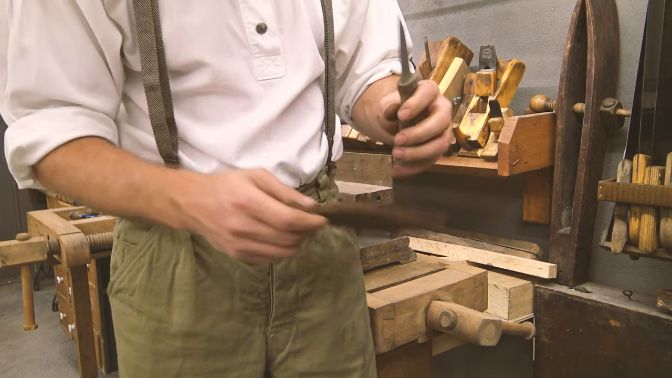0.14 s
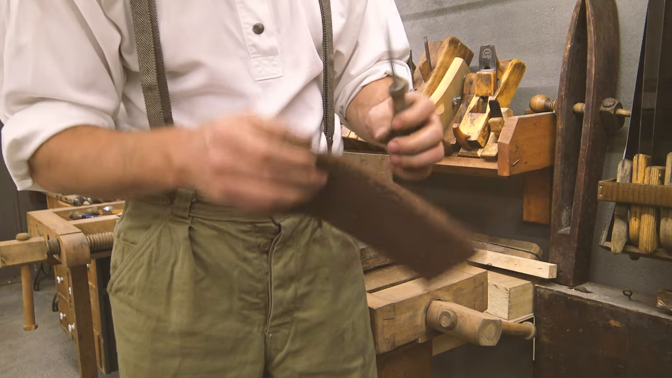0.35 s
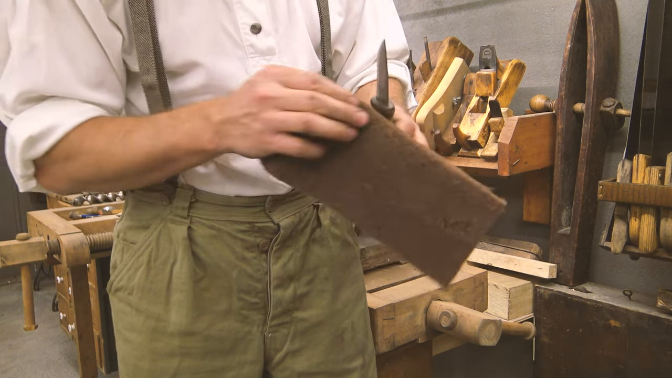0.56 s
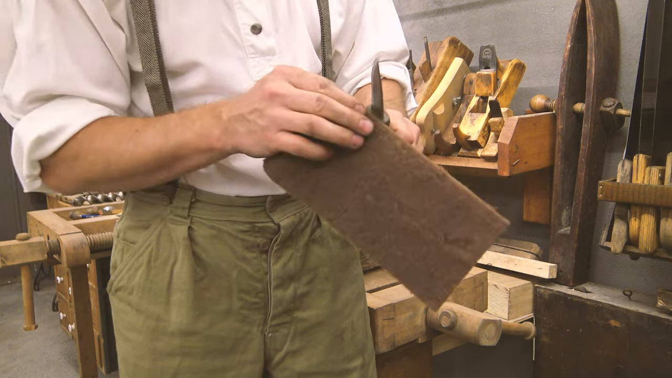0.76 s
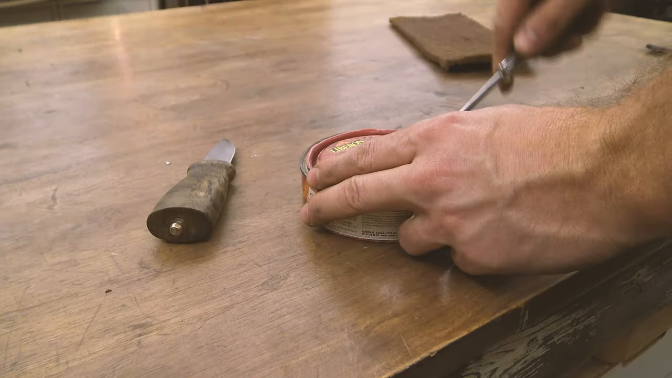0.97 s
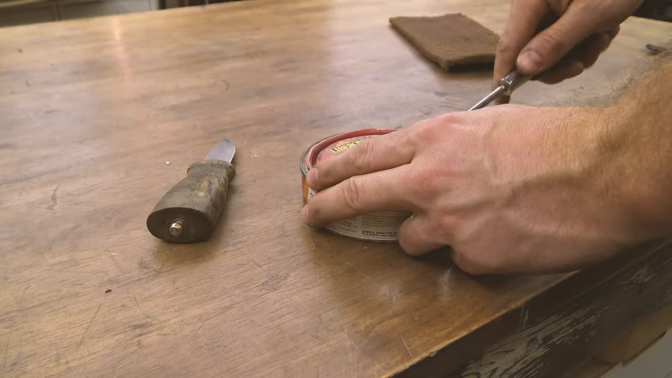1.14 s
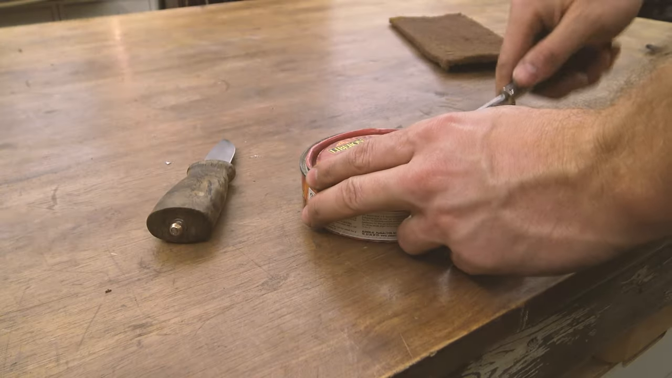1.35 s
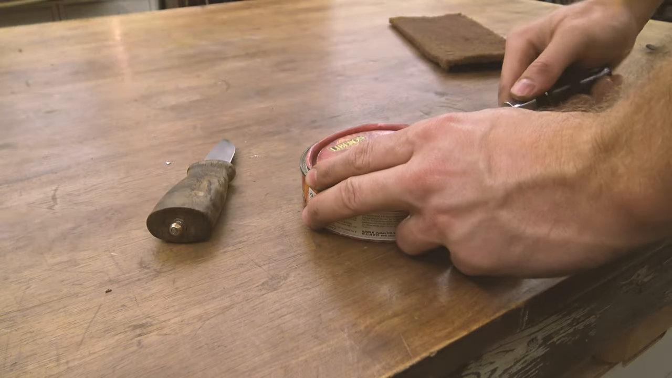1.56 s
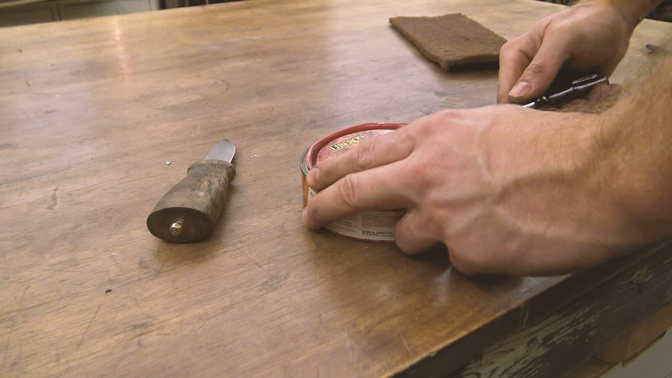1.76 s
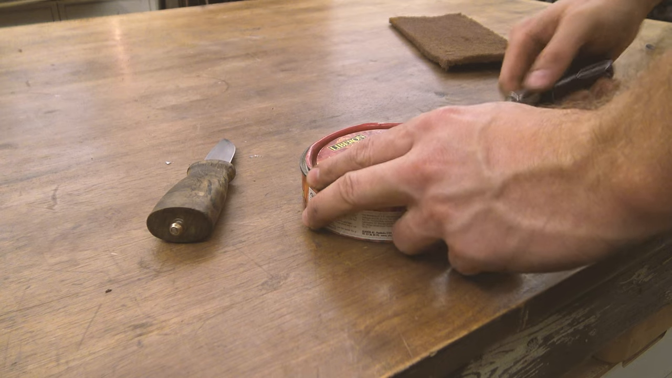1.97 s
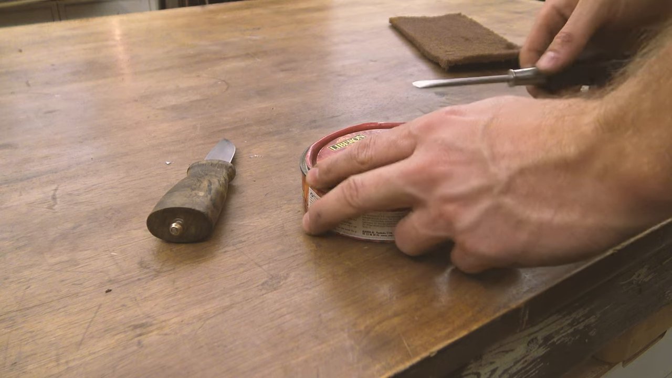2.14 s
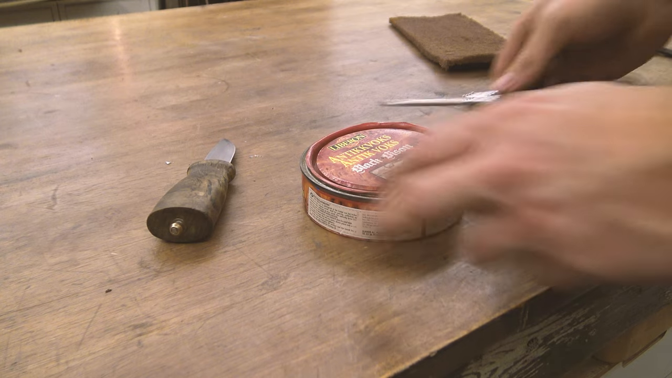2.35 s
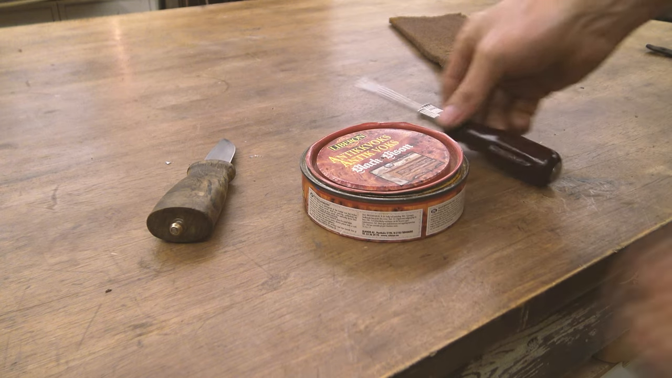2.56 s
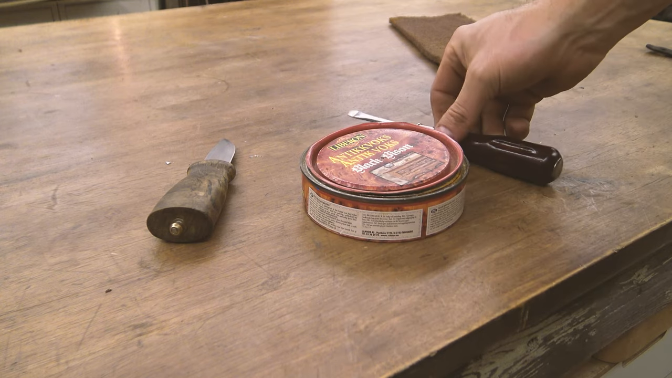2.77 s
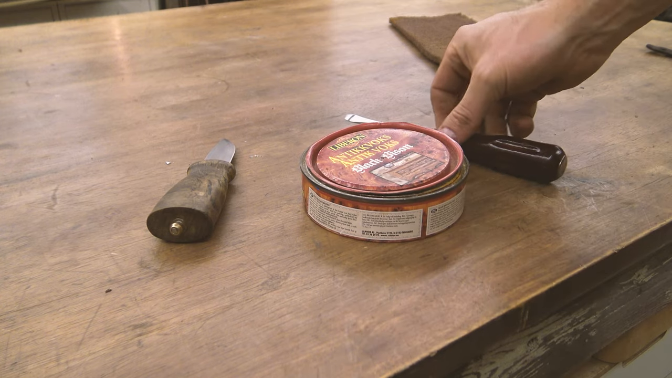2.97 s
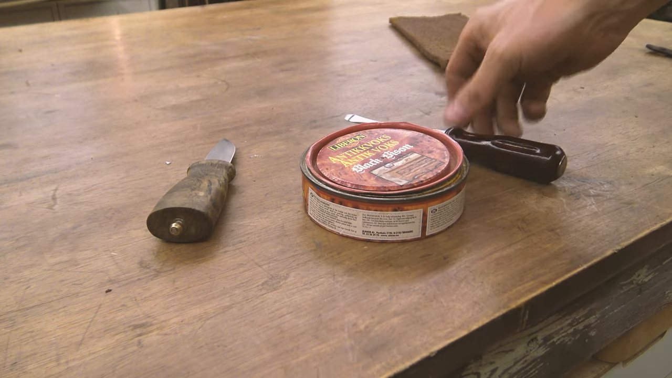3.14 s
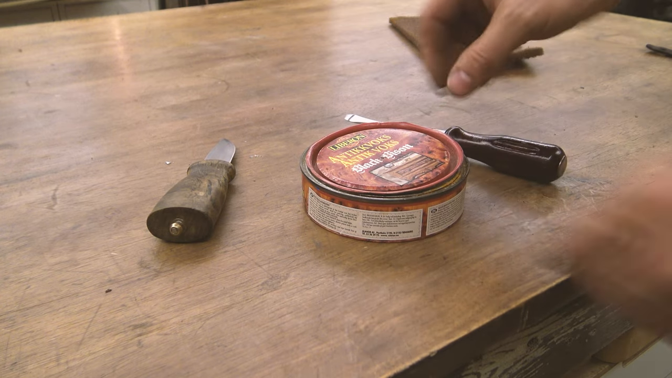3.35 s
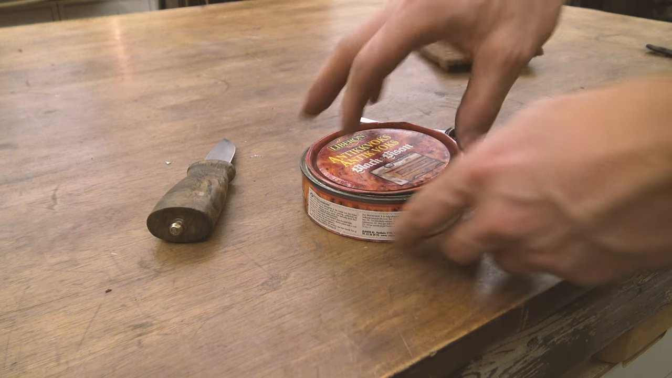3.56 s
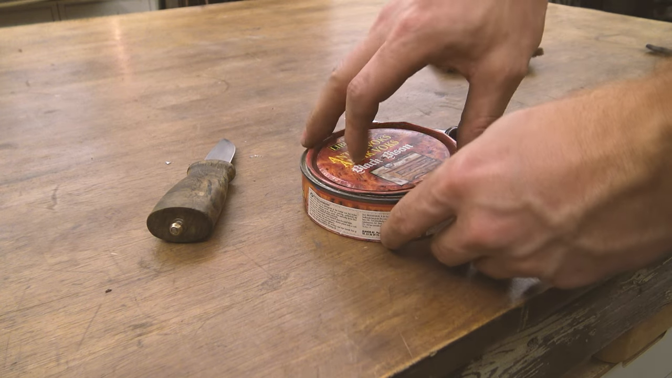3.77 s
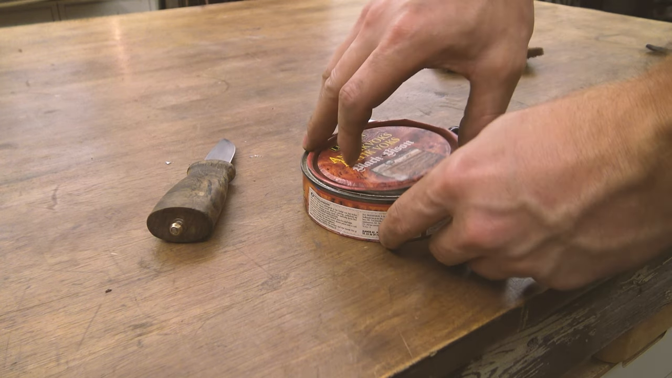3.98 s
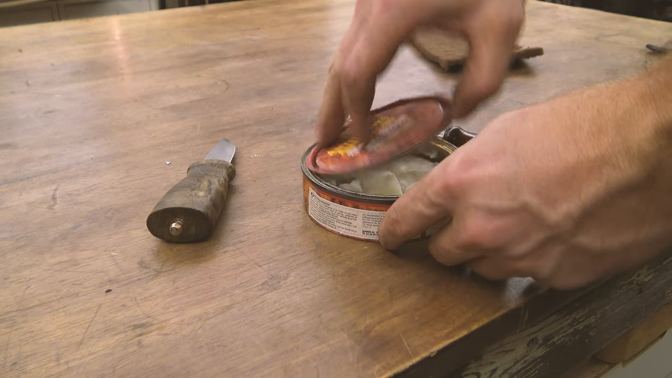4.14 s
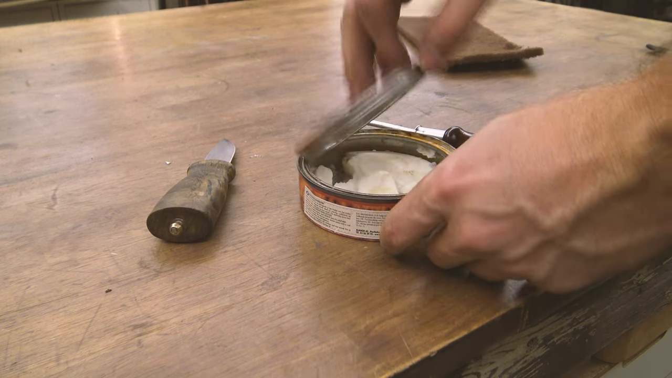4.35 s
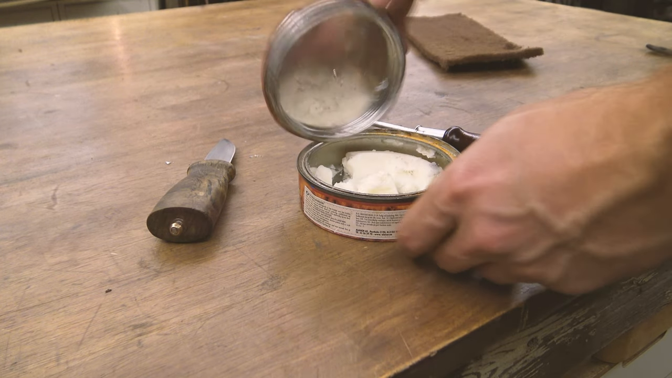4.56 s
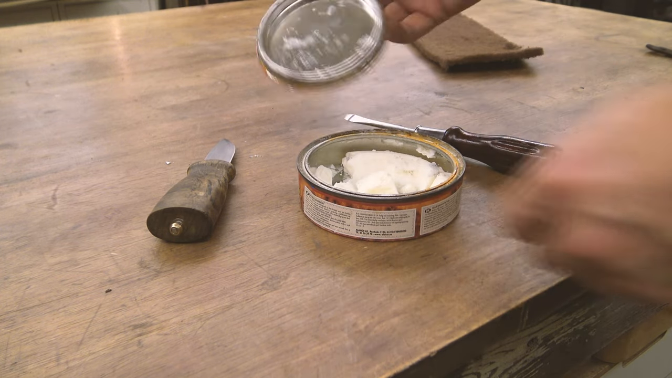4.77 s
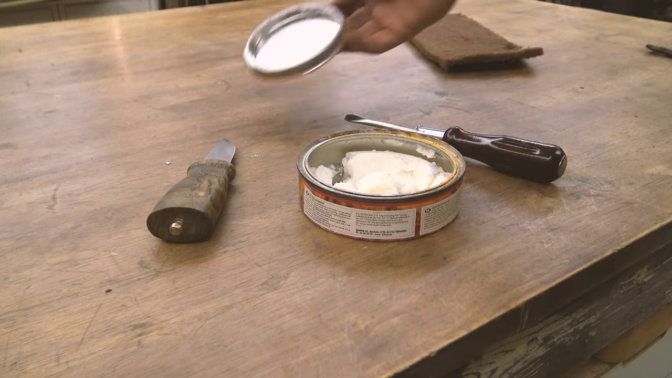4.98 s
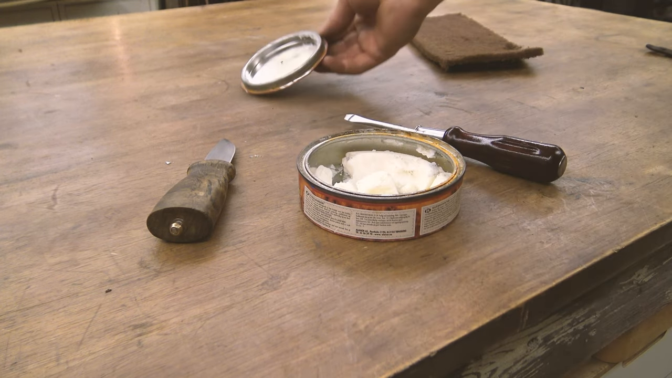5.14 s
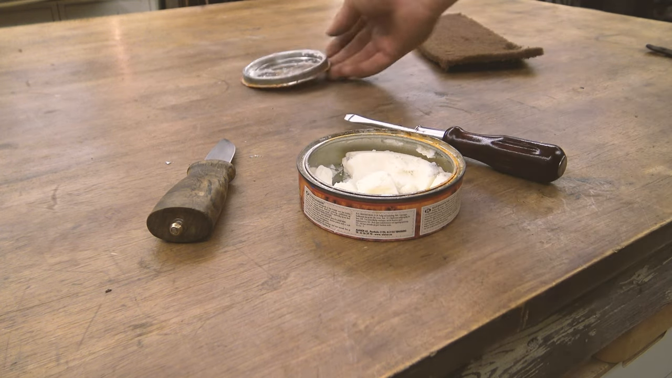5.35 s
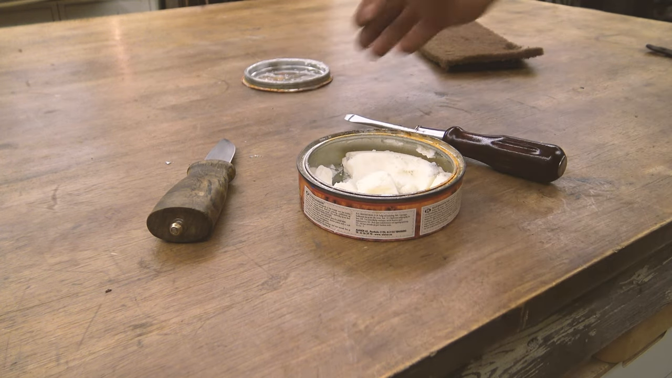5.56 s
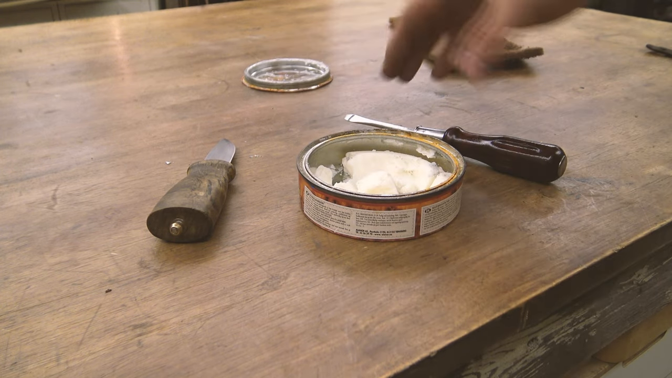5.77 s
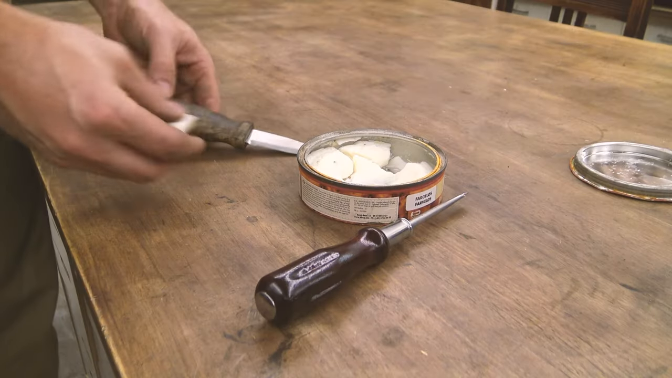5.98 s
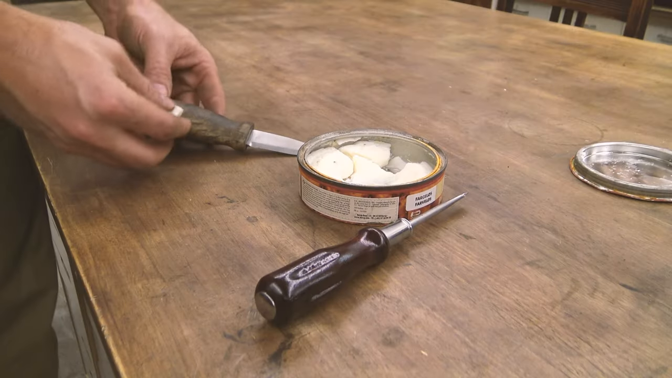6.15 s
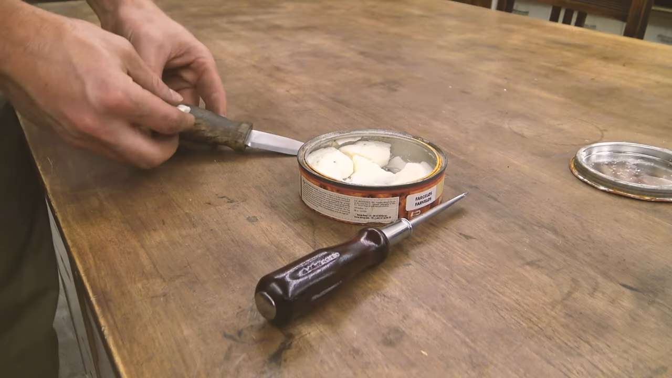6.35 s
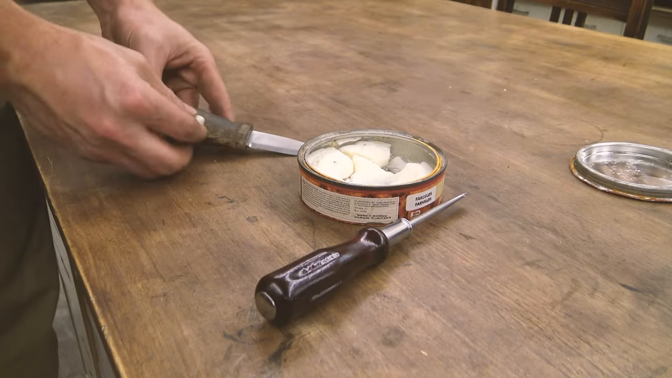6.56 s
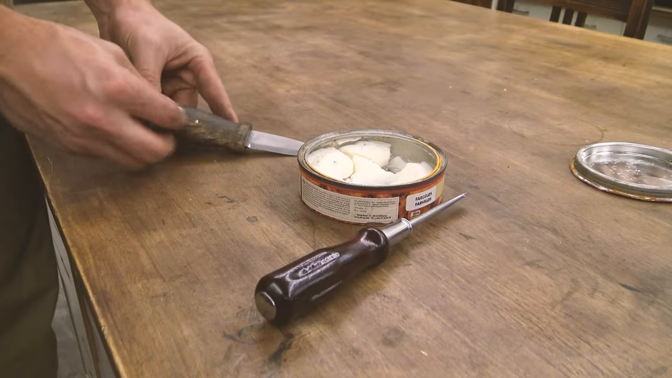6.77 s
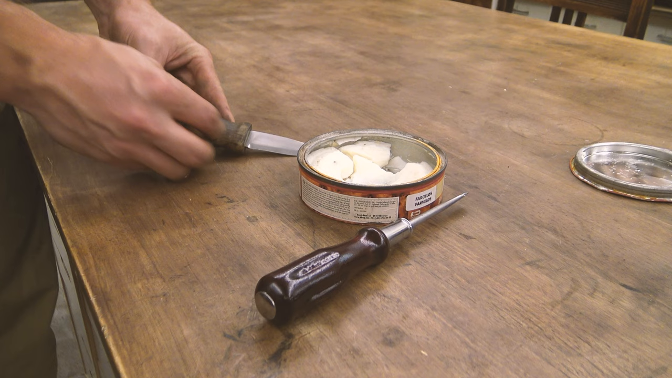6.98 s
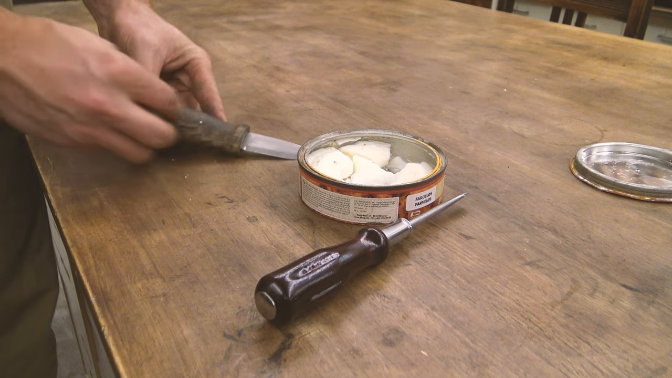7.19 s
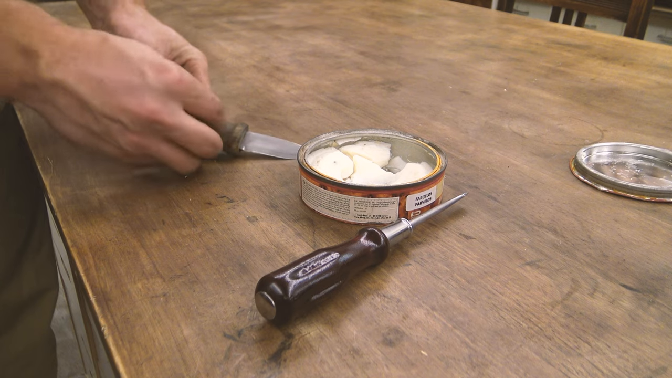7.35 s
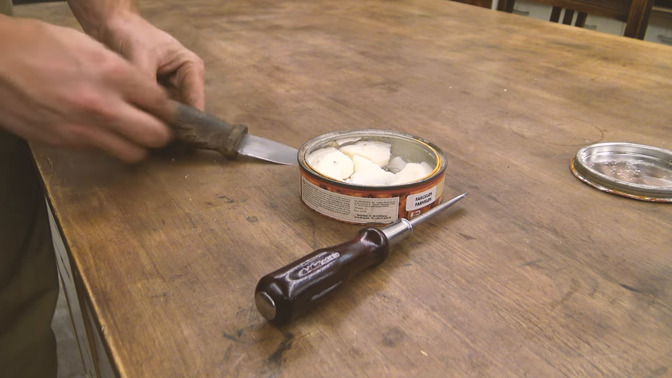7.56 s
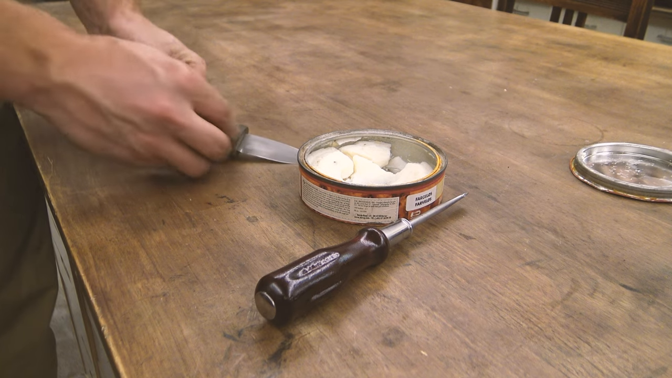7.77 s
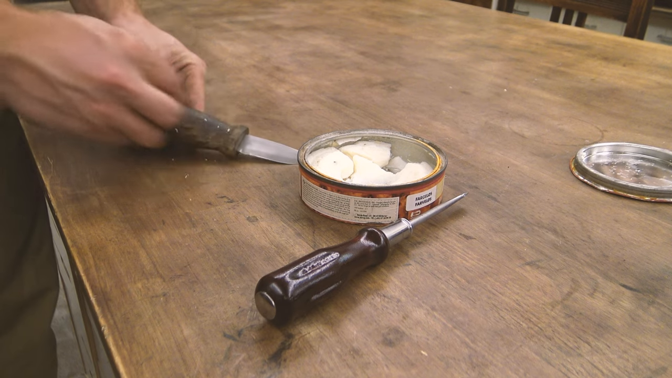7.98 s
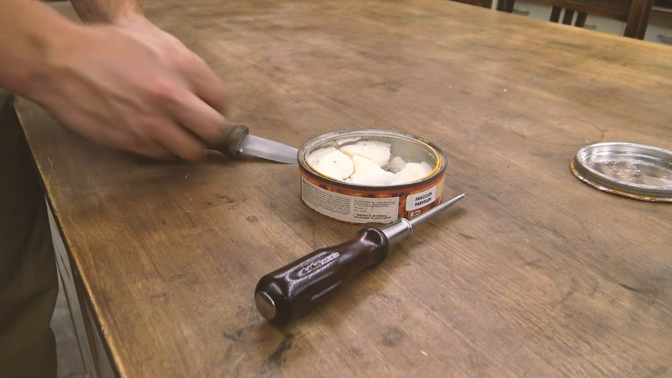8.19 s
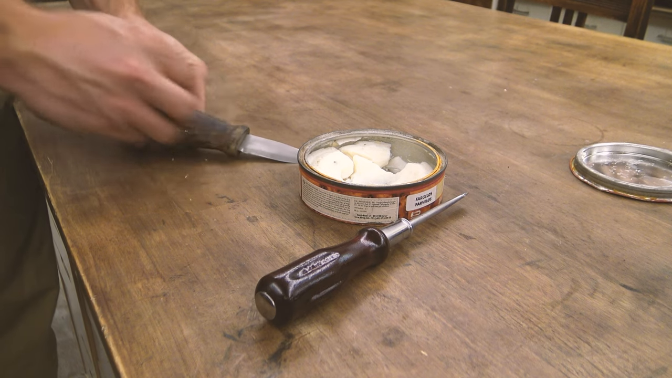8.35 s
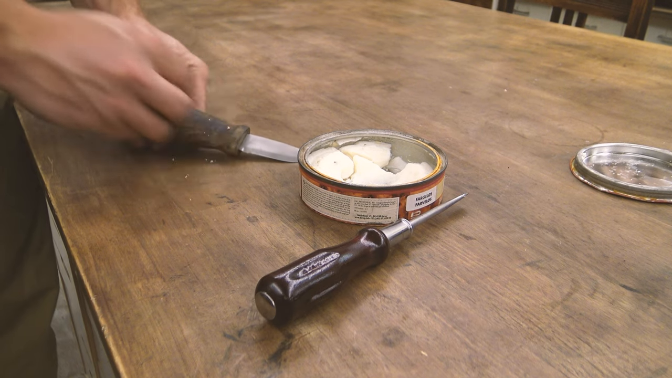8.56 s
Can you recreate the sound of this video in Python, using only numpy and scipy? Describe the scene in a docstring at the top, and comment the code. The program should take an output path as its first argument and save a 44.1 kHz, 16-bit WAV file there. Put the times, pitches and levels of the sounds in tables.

```python
"""At a wooden bench in a small workshop, over a steady hiss, a screwdriver levers at the lid of a tin of wax.
It is put down with a clack. The lid creaks, scrapes free with a hum, is lowered on its edge and clatters flat.
Last, a knife slides on the wood, touches the tin with its tip and knocks down beside it.
One microphone stands close; a farther, roomier one is mixed in a little late, so every knock sounds twice.
A limiter holds the peaks."""
import sys
import numpy as np
from scipy import signal
from scipy.fft import rfft, irfft
from scipy.io import wavfile
from scipy.ndimage import uniform_filter1d, minimum_filter1d

SR = 44100
rng = np.random.default_rng(int(sys.argv[2]) if len(sys.argv) > 2 else 0)


def pcm_store(signal):
    """Save signal as 16-bit PCM."""
    levels = np.round(np.clip(np.atleast_2d(signal), -1, 1) * 32767)
    wavfile.write(sys.argv[1], SR, levels.astype(np.int16).T)


N = 380141
TIME = np.arange(N) / SR
RING_TIME = TIME[:SR]

# Knocks at the bench. Each row: start in seconds, level in dB, contact cut-off in Hz (lower is softer).
LEVER_CATCHES = [(1.002, -53.5, 1300), (1.327, -41, 940), (1.609, -44.5, 7000), (1.865, -58, 900)]   # the screwdriver catches under the rim of the held tin
DRIVER_LANDING = [(2.204, -48, 14000), (2.565, -13.5, 11900), (2.597, -24, 2500), (2.646, -25.5, 1520)]   # it is put down
BENCH_BUMPS = [(2.859, -34.5, 604), (2.871, -31, 2500), (4.464, -39, 4000), (5.93, -59, 596)]   # handle and tin bump the wood
SHORT_CLICKS = [(3.735, -56, 2500), (3.789, -54.5, 2500), (4.063, -47.5, 2500), (4.120, -49.5, 4000)]   # short clicks around the lid's creak, the last two like its echo
CREAK_START = [(3.926, -57.5, 1500)]   # the first slip of the creak
RIM_TICKS = [(4.463, -59.5, 12000), (4.590, -58, 7000), (5.173, -45.5, 8000), (5.425, -58, 6000)]   # the held lid ticks against tin, wood and fingernails
LID_PLUCK = [(4.53, -48, 2500)]   # it springs free
EDGE_KNOCKS = [(5.173, -24.5, 6000), (5.443, -32.5, 895)]   # its edge meets the bench, still in the fingers
LID_TOUCHES = [(5.484, -34, 3900), (5.626, -42, 6000)]   # it touches lightly as it tips and as it settles
LID_SLAP = [(5.4865, -27, 15000)]   # its face slaps the wood
LID_FALL = [(5.487, -15.5, 10100)]   # it lands loose and starts to rock
BLADE_TOUCH = [(7.492, -52.5, 12000)]   # the knife tip meets the tin
KNIFE_KNOCKS = [(7.582, -44.5, 1530), (7.598, -43, 1400), (8.020, -21.5, 12000), (8.030, -35, 12000)]   # the knife handle meets the bench

# Rubbing strokes. Each row: start in seconds, end in seconds, level in dB.
LEVER_GRIND = [(1.335, 1.36, -52.5), (1.603, 1.62, -42.5)]   # screwdriver under the rim
LID_RUB = [(4.26, 4.57, -49)]   # lid leaving its seat
RIM_GRAZE = [(4.597, 4.607, -44.5)]   # rim brushing the tin
EDGE_DRAG = [(5.24, 5.48, -62)]   # lid edge on the wood
KNIFE_SLIDE = [(7.17, 7.22, -63), (7.52, 7.85, -64)]   # knife on the wood

# Gliding resonances. Each row: time in seconds, pitch in Hz.
TIN_AIR = [(4.06, 680), (4.26, 1122)]   # the air in the tin, rising as the gap under the lid widens
BLADE_TONE = [(7.15, 950), (7.3, 1130), (7.75, 1255)]   # the sliding blade

# The dense, dull part of each knock or rub, heard close. Each row: frequency in Hz, relative level in dB.
TIN_COLOUR = [(90, -16.5), (180, -17), (380, -5.5), (450, -8), (660, 1), (790, -13), (1000, -9.5),
              (1700, -19.5), (2300, -19.5), (3300, -29), (8000, -35)]
DRIVER_COLOUR = [(70, -45), (108, -20), (150, -29.5), (210, -14.5), (310, -10.5), (720, -8), (1000, -3),
                 (1200, -11), (1430, -10.5), (1700, -16), (2050, -19.5), (2450, -27), (4000, -33.5),
                 (13000, -59.5)]
BENCH_COLOUR = [(41, -25), (70, -44), (220, -7.5), (268, -10.5), (321, -3), (445, -12), (659, -5),
                (789, -13.5), (976, -17), (1110, -27.5), (2010, -35.5), (3500, -48), (4550, -86),
                (7700, -120)]
CREAK_COLOUR = [(120, -59), (200, -12), (442, -5), (506, -1), (542, -6), (665, 4), (815, -8), (1020, -7),
                (1130, -28), (1570, -24), (3000, -39), (3900, -76), (6600, -120)]
LID_RUB_COLOUR = [(110, -49), (180, -28), (349, -9), (396, -20), (754, -7), (918, -5.5), (1100, -5.5),
                  (2060, -16.5), (2330, -15.5), (2840, -25), (3270, -22), (7330, -24.5), (13000, -44)]
RIM_COLOUR = [(1530, -30), (2600, -29), (3540, -21), (3950, -8), (5790, -10), (6370, -11), (10300, -19),
              (13000, -29)]
HELD_LID_COLOUR = [(47, -52), (80, -41), (267, -15), (613, -20), (763, -4), (870, -8.5), (1210, -4),
                   (1410, -9.5), (1570, 2.5), (1720, -15), (2180, -11), (4210, -27.5), (6250, -27),
                   (15000, -97)]
SLAP_COLOUR = [(45, -6), (100, -5), (300, -8), (1500, -2), (6000, 0), (9000, -6), (15500, -16)]
FREE_LID_COLOUR = [(41, -66), (70, -34), (250, -26.5), (377, -16), (454, -21), (1030, -11), (1660, -18),
                   (1870, -11), (2550, -16.5), (2890, -14.5), (4350, -21), (4820, -16), (5570, -30),
                   (6430, -23), (9500, -45), (12400, -114), (20900, -120)]
KNIFE_SLIDE_COLOUR = [(300, 3.5), (600, 1), (950, 5.5), (1290, -5), (1550, -8), (2600, -12), (4000, -20)]
KNIFE_COLOUR = [(41, -36), (70, -53), (108, -13), (150, -32.5), (223, -14.5), (361, -9.5), (469, -11.5),
                (512, -8), (726, -17.5), (810, -10.5), (1250, -3.5), (1980, -16), (4260, -18),
                (6600, -31.5), (13000, -52)]

# The ringing modes of each object. Each row: frequency in Hz, relative level in dB,
# seconds to fall 60 dB before any extra damping.
TIN_MODES = [(326, -47, 0.035), (603, -18, 0.056), (649, 8, 0.14), (1040, 14, 0.089)]
DRIVER_MODES = [(457, -8.5, 0.2), (675, -9, 0.3), (814, -10, 0.23), (959, 1, 0.1), (1040, -5.5, 0.22),
                (1493, -11, 0.11)]
BENCH_MODES = [(335, -9, 0.049), (378, 5, 0.56), (674, 3, 0.35)]
RIM_MODES = [(2272, -6, .12), (3203, -9, .15), (3887, -4, .22), (4420, -10, .12), (4770, -3, .25),
             (4920, -6, .2), (5319, -8, .1), (6145, -1, .25), (6230, 0, .25), (6665, -5, .22),
             (7095, -9, .1), (10100, -11, .04)]
LID_HUM_MODES = [(764, 0, .85), (1593, -7, .3)]
HELD_LID_MODES = [(764, -21, .3), (1050, -8, .12), (1215, -8, .12), (1590, 1, .14), (1879, -27, .7),
                  (2180, -15, .12), (2895, -22, .2)]
FREE_LID_MODES = [(820, -6, .12), (1020, -3, .15), (1230, -8, .15), (1475, -7, .15), (1879, 10, .23),
                  (2068, -2, .15), (2138, 2, .18), (2240, -7, .15), (2890, -7, .22), (3165, -8, .15),
                  (3315, -7, .15), (3765, -8, .15), (3845, -5, .16), (4685, -9, .15), (4780, -3, .18),
                  (4915, -11, .18), (6200, -1, .18), (6240, -3, .16), (6660, -9, .15), (8180, -12, .12),
                  (9040, -20, .12), (11165, -24, .1)]
BLADE_MODES = [(1680, -2, .08), (2520, -2, .1), (2645, 1, .2), (3680, -4, .06), (3876, 1, .07),
               (4280, 2, .06), (5717, -9, .06)]
KNIFE_MODES = [(211, -7, 0.24), (955, 5.5, 0.41), (1228, 10, 0.16), (1397, 3, 0.26), (1596, 7.5, 0.2),
               (2354, 2, 0.28), (3600, -28, 0.088), (4010, -1, 0.2), (4230, 3, 0.04), (6530, -1, 0.093),
               (6940, -7, 0.26)]

# The tone of the place and the pickup. Each row: frequency in Hz, relative level in dB.
ROOM_HISS = [(15, -66), (25, -30.5), (49, -7.5), (87, -3.5), (123, -2), (317, -1), (354, -1.5), (607, -5),
             (659, -2), (863, -4), (1230, -6.5), (1740, -9.5), (6920, -13), (14400, -22.5), (16000, -34.5)]   # the workshop's steady background
WALL_TONE = [(30, 0), (5000, 0), (9000, -4), (16000, -8)]   # the walls soak up the top of the reflections
FAR_MIC_TONE = [(50, -3), (300, 1.5), (700, -2), (1600, 1.5), (4000, -1.5), (8000, -4.5), (16000, -1)]   # the far microphone is thin in the bass
# The workshop's reverberation. Each row: frequency in Hz, seconds to fall 60 dB.
ROOM_T60 = [(100, 0.84), (300, 0.44), (700, 0.45), (1800, 0.34), (5000, 0.32), (12000, 0.16)]

HISS_DB, FAR_MIC_LAG_S, CUTOFF_HZ = -58, .0548, 15800


def from_db(db):
    """Decibels to gain."""
    return np.exp(np.asarray(db) * np.log(10) / 20)


def unit_energy(x):
    """Scale to a total energy of one."""
    return x / np.sqrt(np.sum(x ** 2) + 1e-20)


def unit_rms(x):
    """Scale to a mean power of one."""
    return unit_energy(x) * np.sqrt(len(x))


def at_hz(points, hz):
    """Read a table on a log-frequency axis."""
    freqs, values = np.transpose(points)
    return np.interp(np.log(np.maximum(hz, 1)), np.log(freqs), values)


def dying(t60):
    """An envelope that falls 60 dB in t60 seconds."""
    return from_db(np.maximum(-60 * RING_TIME / max(t60, 1e-3), -300))


def convolve(x, response):
    """Play x through an impulse response."""
    return signal.oaconvolve(x, response)[:len(x)]


def minimum_phase(db):
    """Impulse response of the causal filter with these gains on an even frequency grid."""
    cepstrum = irfft(np.log(from_db(db)))
    half = len(cepstrum) // 2
    cepstrum[1:half] *= 2
    cepstrum[half + 1:] = 0
    return irfft(np.exp(rfft(cepstrum)))


def coloured(x, spectrum, size=8192):
    """Filter x with a spectrum table, falling 12 dB an octave beyond its ends."""
    hz = np.maximum(np.arange(size // 2 + 1) * SR / size, 10)
    octaves_outside = np.abs(np.log2(hz / np.clip(hz, spectrum[0][0], spectrum[-1][0])))
    return convolve(x, minimum_phase(at_hz(spectrum, hz) - 12 * octaves_outside))


def evened(response, span_hz):
    """Give a one-second response equal energy in every stretch of span_hz; finer ripple stays."""
    power = uniform_filter1d(np.abs(rfft(response)) ** 2, size=span_hz)
    return unit_energy(convolve(response, minimum_phase(-10 * np.log10(power + 1e-12))))


def body(colour, modes, thud_t60, crack_db, ring_db, sustain=1):
    """An object's answer to one tap: a crack, a dense thud and clear modes, damped by a sustain below 1."""
    thud = unit_energy(rng.standard_normal(SR) * dying(thud_t60))
    thud[0] += from_db(crack_db)
    thud = unit_energy(coloured(evened(thud, span_hz=61), colour))
    ring = sum((-1) ** k * from_db(db) * np.sin(2 * np.pi * hz * RING_TIME) * dying(t60 * sustain)
               for k, (hz, db, t60) in enumerate(modes))
    return unit_energy(thud + from_db(ring_db) * unit_energy(ring))


def taps(rows, size=512):
    """One force pulse a row, wider for a softer contact."""
    force = np.zeros(N)
    for start, db, cut_hz in rows:
        softness = signal.butter(2, min(cut_hz, .45 * SR), fs=SR)
        at = round(start * SR)
        force[at:at + size] += from_db(db) * signal.lfilter(*softness, signal.unit_impulse(size))
    return force * np.sqrt(.02 * SR)


def repeated(rows, gap_s, step_db, shrink=1, count=2):
    """Each contact starts a run: every repeat changes by step_db, and each gap is the last times shrink."""
    delays = np.cumsum([0, *(gap_s * shrink ** np.arange(count - 1))])
    return [(start + delay, db + k * step_db, cut_hz)
            for start, db, cut_hz in rows for k, delay in enumerate(delays)]


def strokes(rows, attack_s, sag_db_per_s, release_s):
    """Gain of rubbing strokes: each swells 60 dB up to its start, sags, and dies after its end."""
    gain = 0
    for start, end, db in rows:
        outside = np.maximum(start - TIME, 0) / attack_s + np.maximum(TIME - end, 0) / release_s
        sag_db = sag_db_per_s * np.clip(TIME - start, 0, end - start)
        gain = gain + from_db(db - sag_db - 60 * np.minimum(outside, 2))
    return gain


def friction(stroke, per_s, spread_db):
    """Many tiny slips of uneven size under the gain of a stroke."""
    sizes = from_db(spread_db * np.minimum(rng.exponential(1, N), 4))
    signs = rng.choice([-1, 1], N)
    slipping = rng.random(N) < per_s / SR
    return stroke * unit_rms(sizes * signs * slipping)


def gliding_resonance(x, pitch, width_hz):
    """A resonance whose centre follows a pitch table; gain one at its top."""
    centre_hz = np.interp(TIME, *np.transpose(pitch))
    turn = np.exp(2j * np.pi * np.cumsum(centre_hz) / SR)
    pole = np.exp(-np.pi * width_hz / SR)
    return 2 * np.real(turn * signal.lfilter([1 - pole], [1, -pole], x / turn))


def prising():
    """The screwdriver grinds under the rim and catches in pairs; the hand keeps the tin's knocks short."""
    catches = taps(repeated(LEVER_CATCHES, gap_s=.008, step_db=-7))
    stroke = strokes(LEVER_GRIND, attack_s=.08, sag_db_per_s=60, release_s=.067)
    grind = friction(stroke, per_s=430, spread_db=2.5)
    tin = body(TIN_COLOUR, TIN_MODES, thud_t60=.11, crack_db=-15, ring_db=-12.5)
    return convolve(catches + grind, tin)


def screwdriver_and_bench():
    """The heavy handle clacks down and bounces; softer bumps wake the bench top and rock back once."""
    handle = body(DRIVER_COLOUR, DRIVER_MODES, thud_t60=.061, crack_db=-10, ring_db=-5.5, sustain=.86)
    bench = body(BENCH_COLOUR, BENCH_MODES, thud_t60=.13, crack_db=-4, ring_db=-7)
    bumps = taps(repeated(BENCH_BUMPS, gap_s=.034, step_db=-13.5))
    return convolve(taps(DRIVER_LANDING), handle) + convolve(bumps, bench)


def lid_creak():
    """Amid short clicks the lid creaks in even slips, harder as the pull grows, sounding the air inside."""
    creak = taps(repeated(CREAK_START, gap_s=.03, step_db=3.5, count=4))
    tin = body(CREAK_COLOUR, TIN_MODES, thud_t60=.015, crack_db=4, ring_db=-15, sustain=.42)
    hollow = gliding_resonance(creak, TIN_AIR, width_hz=22)
    return convolve(taps(SHORT_CLICKS) + creak, tin) + from_db(30.5) * hollow


def lid_lifted():
    """The lid scrapes the rim, sounding the air under it, springs free with a hum and grazes the tin."""
    pull = strokes(LID_RUB, attack_s=.82, sag_db_per_s=26.5, release_s=.61)
    slips = friction(pull, per_s=700, spread_db=2)
    seated_lid = body(LID_RUB_COLOUR, RIM_MODES, thud_t60=.013, crack_db=8.5, ring_db=-17, sustain=.28)
    scrape = from_db(2) * convolve(slips, seated_lid)
    hollow = from_db(14) * gliding_resonance(slips, TIN_AIR, width_hz=36)
    sprung_lid = body(LID_RUB_COLOUR, LID_HUM_MODES, thud_t60=.03, crack_db=-3, ring_db=12)
    hum = convolve(taps(LID_PLUCK), sprung_lid)
    brush = strokes(RIM_GRAZE, attack_s=.031, sag_db_per_s=14, release_s=.013)
    graze = friction(brush, per_s=1500, spread_db=3)
    rim = body(RIM_COLOUR, RIM_MODES, thud_t60=.011, crack_db=-8, ring_db=5, sustain=.13)
    return scrape + hollow + hum + convolve(graze, rim)


def lid_lowered():
    """Still in the fingers, the lid ticks at its rim; one edge lands and drags on the wood."""
    ticked_rim = body(RIM_COLOUR, RIM_MODES, thud_t60=.025, crack_db=-25, ring_db=-2)
    ticks = convolve(taps(RIM_TICKS), ticked_rim)
    stroke = strokes(EDGE_DRAG, attack_s=.04, sag_db_per_s=17, release_s=.024)
    drag = friction(stroke, per_s=670, spread_db=2)
    dragged_rim = body(RIM_COLOUR, RIM_MODES, thud_t60=.026, crack_db=-12, ring_db=-.5)
    held_lid = body(HELD_LID_COLOUR, HELD_LID_MODES, thud_t60=.074, crack_db=-14, ring_db=-3.5)
    return ticks + convolve(drag, dragged_rim) + convolve(taps(EDGE_KNOCKS), held_lid)


def lid_dropped():
    """Let go, the lid slaps flat and rings freely, rocking ever faster and weaker."""
    face = body(SLAP_COLOUR, RIM_MODES, thud_t60=.016, crack_db=-20, ring_db=-5, sustain=.4)
    rocking = taps(repeated(LID_FALL, gap_s=.0195, step_db=-4, shrink=.9, count=7))
    free_lid = body(FREE_LID_COLOUR, FREE_LID_MODES, thud_t60=.05, crack_db=-12.5, ring_db=2.5)
    return convolve(taps(LID_SLAP), face) + convolve(rocking + taps(LID_TOUCHES), free_lid)


def knife():
    """The knife slides on the wood with a faint tone, and its handle knocks down."""
    handle = body(KNIFE_COLOUR, KNIFE_MODES, thud_t60=.058, crack_db=-6, ring_db=-3.5, sustain=.45)
    push = strokes(KNIFE_SLIDE, attack_s=.33, sag_db_per_s=5, release_s=.25)
    slips = friction(push, per_s=960, spread_db=1.5)
    slide = from_db(10) * coloured(slips, KNIFE_SLIDE_COLOUR)
    tone = from_db(22) * gliding_resonance(slips, BLADE_TONE, width_hz=52)
    return slide + tone + convolve(taps(KNIFE_KNOCKS), handle)


def blade_ping():
    """The tip of the blade touches the tin and rings briefly."""
    blade = body(RIM_COLOUR, BLADE_MODES, thud_t60=.02, crack_db=-12, ring_db=13)
    return convolve(taps(BLADE_TOUCH), blade)


def workshop(build_s, octaves=9, lowest_hz=62.5):
    """Diffuse reflections at one microphone: they build up, then every octave dies at its own rate."""
    white = rfft(rng.standard_normal(SR))
    octave = np.log2(np.maximum(np.arange(len(white)), 1) / lowest_hz)
    tail = 0
    for k in range(octaves):
        share = np.maximum(1 - np.abs(np.clip(octave, 0, octaves - 1) - k), 0)
        tail = tail + irfft(white * share, SR) * dying(at_hz(ROOM_T60, lowest_hz * 2 ** k))
    building = 1 - np.exp(-RING_TIME / build_s)
    return coloured(evened(tail * building, span_hz=121), WALL_TONE)


def microphones(sources, near_room_db, far_direct_db, far_room_db):
    """A close microphone plus a late, roomier one; each source is (sound, dB toward the far one)."""
    near = sum(sound for sound, _ in sources)
    far = coloured(sum(from_db(reach_db) * sound for sound, reach_db in sources), FAR_MIC_TONE)
    near = near + from_db(near_room_db) * convolve(near, workshop(build_s=.0014))
    far = from_db(far_direct_db) * far + from_db(far_room_db) * convolve(far, workshop(build_s=.0011))
    return near + np.pad(far, (round(FAR_MIC_LAG_S * SR), 0))[:N]


def scene():
    """The bench from two distances, in mono over hiss; hands shield some sounds from the far microphone."""
    sources = [(prising(), -4), (screwdriver_and_bench(), .1), (lid_creak(), -4), (lid_lifted(), -1.5),
               (lid_lowered(), 2.5), (lid_dropped(), 2.5), (knife(), 1.5), (blade_ping(), -9)]
    hiss = from_db(HISS_DB) * unit_rms(coloured(rng.standard_normal(N), ROOM_HISS))
    return (microphones(sources, near_room_db=-4, far_direct_db=2, far_room_db=2) + hiss)[None]


def record(dry):
    """A fast limiter on the microphone mix ducks the loudest peaks and recovers; the top is cut."""
    ceiling, recovery_db_per_s = .35, 400
    over_db = 20 * np.log10(np.maximum(np.abs(dry[0]) / ceiling, 1))
    recovery_db = recovery_db_per_s * TIME
    held_db = np.maximum.accumulate(over_db + recovery_db) - recovery_db
    gain = uniform_filter1d(minimum_filter1d(from_db(-held_db), size=89), size=89)   # eased over 2 ms
    low_pass = signal.ellip(10, .1, 80, CUTOFF_HZ, fs=SR, output="sos")
    return signal.sosfilt(low_pass, dry * gain)


dry = scene()
out = record(dry)
pcm_store(out)
```